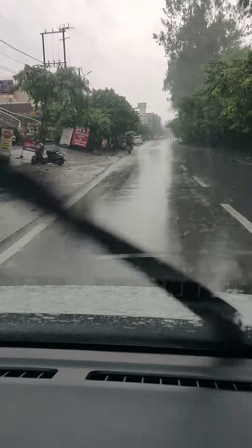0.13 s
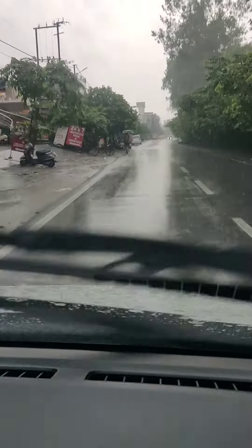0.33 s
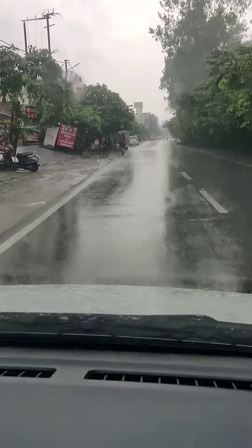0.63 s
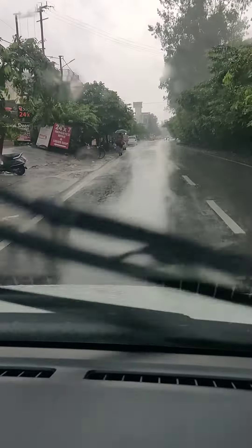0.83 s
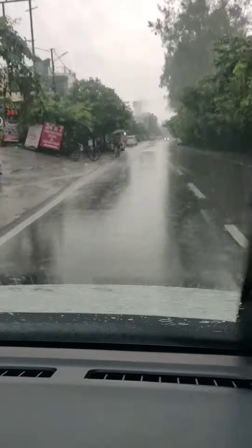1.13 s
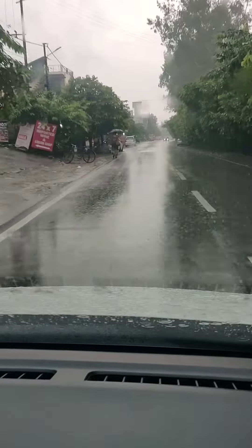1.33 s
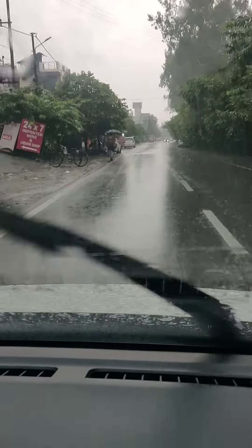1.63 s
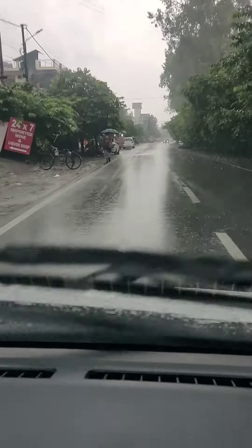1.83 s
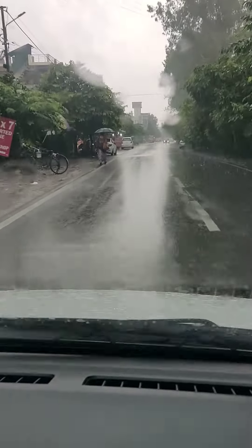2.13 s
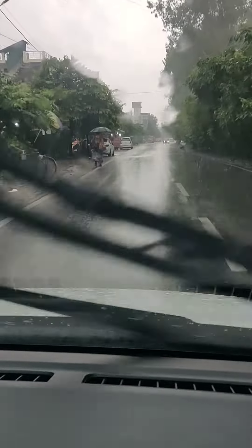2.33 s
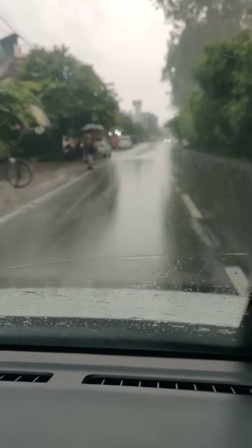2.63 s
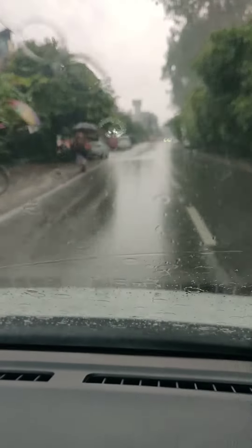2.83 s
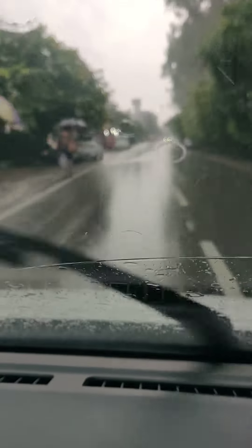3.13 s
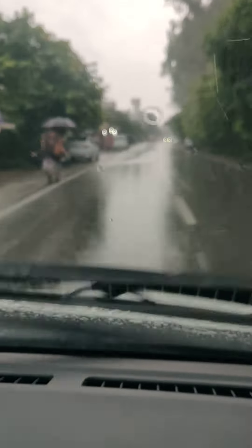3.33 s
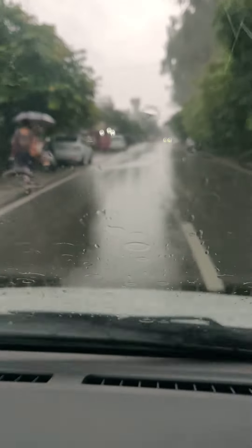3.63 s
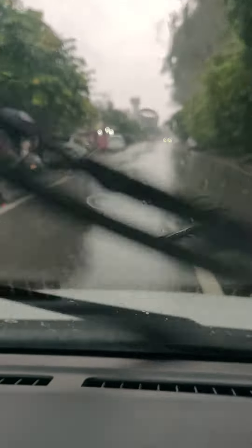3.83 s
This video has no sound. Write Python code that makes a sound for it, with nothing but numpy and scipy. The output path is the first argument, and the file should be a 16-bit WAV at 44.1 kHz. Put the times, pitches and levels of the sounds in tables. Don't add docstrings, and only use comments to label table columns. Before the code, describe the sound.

Deep road and engine rumble inside a small car, opening thin and quiet at 0.07 s, gaining bass at 0.2 s and growing fuller. Soft wet spray hiss lies beneath; a faint tread hum eases after 1.5 s. Dull wiper thuds fall near 0.7, 1.5, 2.2, 3.0 and 3.7 s. Rough-road knocks and trim rattle cluster at 1.9-2.4 s, then small jolts and wavering boom continue to 4 s.

```python
import sys
import numpy as np
from scipy import signal
from scipy.fft import rfft, irfft
from scipy.io import wavfile
from scipy.ndimage import uniform_filter1d

SR = 44100
rng = np.random.default_rng(int(sys.argv[2]) if len(sys.argv) > 2 else 0)


def transcribe(u):
    v = np.clip(np.atleast_2d(u).T, -1, 1)
    q = np.round(v * 32767).astype(np.int16)
    wavfile.write(sys.argv[1], SR, q)


def elevation(decibels):
    levels = np.asarray(decibels, float)
    return 10 ** (levels / 20)


N = 176400
t = np.arange(N) / SR
FREQ = np.maximum(np.arange(N // 2 + 1) * SR / N, 1)

# (frequency [Hz], density [dB per Hz])
SPRAY_COLOUR = [(400, -15), (800, -0.5), (1450, -5), (2950, -12), (5200, -19), (6900, -20), (9400, -36.5),
                (15500, -35.5)]
# (multiple of firing rate [1], level [dB])
ENGINE_ORDERS = [(1, -40.5), (2, -36), (4, -35.5)]
# (time [s], level [dB], length [s], top frequency [Hz])
THUDS = [
    (0.69, -24, .08, 420),
    (1.5, -26, .055, 320),
    (2.178, -30, 0.052, 426),
    (2.985, -25, 0.07, 480),
    (3.699, -28.5, 0.05, 317),
    (2.352, -28, .05, 594),
    (2.2, -27, .16, 330),
]
# (time [s], level [dB], ring [Hz], t60 [s])
KNOCKS = [(2.226, -21, 300, 0.14), (2, -13, 117, .15), (2.297, -12, 102, 0.3), (2.325, -13, 98, .2),
          (1.9, -20, 262, .25), (1.11, -21, 205, .25), (2.349, -16, 250, 0.12), (2.349, -17, 550, 0.16),
          (2.372, -20, 580, .14), (2.398, -21, 420, .1), (2.405, -23, 560, .08), (2.356, -27, 1050, 0.043),
          (2.356, -18, 464, .07), (2.374, -17.5, 264, 0.13), (2.386, -11.5, 277, 0.086),
          (2.7, -22, 500, 0.082), (2.7, -15, 104, .15), (2.1, -13, 117, 0.054), (2.177, -22, 470, .12),
          (2.181, -20, 390, .12), (.694, -20.5, 434, 0.05), (0.69, -14, 181, 0.11),
          (.706, -14.5, 127.7, 0.25), (.745, -14.5, 82, .16), (2.995, -20.5, 513, 0.046),
          (1.524, -14.5, 195, 0.16), (1.512, -12, 98.5, .14), (1.537, -22, 490, 0.045),
          (1.486, -18, 187, .08), (3.005, -17, 125, 0.22), (2.998, -17, 193, .15), (3.719, -17, 200, 0.12),
          (3.668, -18.5, 360, 0.044)]
# (time [s], level [dB], ring [Hz], t60 [s])
MORE_KNOCKS = [(.578, -29, 560, .04), (.574, -24, 330, .05), (.952, -24, 330, .05), (.978, -24.5, 232, .13),
               (1.165, -19, 278, .06), (1.424, -28, 560, 0.037), (1.432, -16, 128, .11), (1.664, -24, 395, 0.044),
               (1.718, -21, 431, .04), (3.094, -23, 360, 0.055), (3.148, -24.5, 395, .08), (3.189, -27, 555, .04),
               (3.235, -15, 124, .3), (3.122, -15, 90, .12), (3.6, -17, 100, .2), (2.664, -16, 130, .3),
               (3.33, -29.5, 610.5, .4), (3.431, -19.5, 228.5, .15), (3.583, -22, 257, 0.097),
               (3.761, -22.5, 330, .05), (3.841, -28, 513, .04)]
# (frequency [Hz], density [dB per Hz])
RUMBLE_COLOUR = [(20, -2), (45, -1.5), (90, -5.5), (170, -10.5), (330, -16), (600, -22), (760, -29),
                 (16000, -120)]
# (frequency [Hz], width [Hz], level [dB], surge [dB])
CABIN_MODES = [(27.5, 9, -29.5, 1), (52.7, 7.6, -32.5, 5), (103.3, 14.5, -36, 2.5), (132.2, 22, -35, 2.5),
               (193, 21.4, -38, 3), (254.1, 17, -40.5, 2.2), (337.5, 26.5, -42, 2), (439, 47, -48.5, 2.5),
               (605.3, 32, -47, 2)]
# (time [s], hiss level under settling gain [dB], bass over hiss [dB], boom over hiss [dB])
DRIVE = [(0.27, -56.5, 23, 22), (0.39, -54, 22.5, 18), (1.55, -49, 26, 18), (1.57, -49, 16.5, 6),
         (1.73, -48.5, 24.5, 24), (1.8, -49.5, 22.5, -6), (1.93, -48.5, 26, 26.5), (2.13, -48, 20.5, 13),
         (2.18, -47, 25.5, 21.5), (2.53, -47.5, 22, 10.5), (2.54, -47, 18.5, 17), (3.34, -47, 26.5, 24),
         (3.44, -47, 23.5, 16), (3.54, -47, 20, 26), (3.69, -47.5, 25, 7), (3.73, -47, 23, 21.5),
         (3.91, -47.5, 20.5, 16), (4.0, -47, 18, 24.5)]
# (frequency [Hz], left minus right [dB])
BALANCE = [(40, 1.5), (250, 0.7), (700, 3.5), (1400, 4), (2800, 4), (5500, 0.5), (7000, 1.5), (9500, -5.5)]
# (frequency [Hz], likeness [0-1])
ALIKE = [(30, 0.98), (80, .99), (140, 0.86), (300, 0.97), (600, 0.73), (900, 0.2), (1400, 0), (15000, 0.02)]
# (frequency [Hz], depth share [1])
PATCHINESS = [(1500, 0.03), (3000, 0.27), (4500, 1.05), (5400, 1.3), (6200, 1.3), (8500, 1.3),
              (11000, 1.06), (15000, 0.7)]
# (time [s], gain [dB])
OPENING_GAIN = [(.068, -23), (.09, -20.5), (.125, -17), (.17, -14), (.23, -11)]

DRIVE_S, DRIVE_HISS_DB, DRIVE_BASS_DB, DRIVE_BOOM_DB = np.array(DRIVE, float).T
HISS_FULL_DB = -48
FIRING_HZ = 26.24


def table(rows, hz):
    rows = np.array(rows, float)
    return np.interp(np.log(hz), np.log(rows[:, 0]), rows[:, 1])


def level(x, db):
    return x * elevation(db) / np.sqrt(np.mean(x ** 2) + 1e-20)


def ring(x, hz, width_hz):
    return signal.lfilter(*signal.iirpeak(hz, hz / width_hz, fs=SR), x)


def walk(rate_hz):
    hold = int(SR / rate_hz)
    steps = np.repeat(rng.standard_normal(N // hold + 1), hold)
    w = uniform_filter1d(uniform_filter1d(steps, hold), hold)[:N]
    return (w - w.mean()) / w.std()


def noise():
    return rng.standard_normal(N)


def pair(excite):
    alike = np.clip(table(ALIKE, FREQ), 0, 1)
    mid = rfft(excite()) * np.sqrt(1 + alike)
    side = rfft(excite()) * np.sqrt(1 - alike)
    return np.array([mid + side, mid - side])


def bands(spectra, colour, lo_hz, count, flicker_db, shared_db):
    out = 0
    octave = np.log2(FREQ / lo_hz)
    spectra = spectra * elevation(table(colour, FREQ)) * (FREQ > 12)
    for k in range(count):
        place = np.clip(2 * octave - k, -9 if k else 0, 9 if k < count - 1 else 0)
        share = np.cos(np.pi / 2 * np.clip(place, -1, 1)) ** 2
        out = out + irfft(spectra * share, N) * elevation(flicker_db * walk(9.02) + shared_db)
    return out


def wet():
    drops_per_s, spread_db, decay_s = 900, 3, 0.002
    drops = (rng.random(N) < drops_per_s / SR) * elevation(spread_db * rng.exponential(size=N))
    smear = signal.lfilter([1], [1, -np.exp(-1 / (decay_s * SR))], drops)
    return noise() + level(smear * noise(), -9)


def spray():
    colour = [(60, -57)] + list(SPRAY_COLOUR)
    hiss = bands(pair(wet), colour, 750, count=9, flicker_db=0.25, shared_db=0.5 * walk(12))
    return level(hiss, -38.5)


def hum():
    hz, width_hz, surge_db, fades_s = 612, 45, 2.5, 1.45
    push = irfft(pair(noise), N) * elevation(surge_db * walk(12))
    tone = ring(ring(push, hz, width_hz), hz, width_hz)
    return level(tone, -43) / (1 + (t / fades_s) ** 6)


def engine():
    boom_order, boom_db = 5, -2
    phase = 2 * np.pi * np.cumsum(FIRING_HZ * (1 + 0.0199 * walk(1.5))) / SR
    low = 0
    for order, db in ENGINE_ORDERS:
        gain = np.sqrt(2) * elevation(db + 2.9 * walk(5.09))
        low = low + gain * np.sin(order * phase + rng.uniform(0, 2 * np.pi))
    boom_phase = 2 * np.pi * boom_order * np.cumsum(FIRING_HZ * (1 + 0.06 * walk(14))) / SR
    swell_db = np.interp(t, DRIVE_S, DRIVE_BOOM_DB) + HISS_FULL_DB + boom_db + 2.55 * walk(11)
    port_phase = np.array([[0.12], [-0.12]])
    return low + np.sqrt(2) * elevation(swell_db) * np.sin(boom_phase + port_phase)


def wipers():
    attack_s, low_hz = 0.0071, 83
    out = 0
    shake = irfft(pair(noise), N)
    for at, db, length_s, top_hz in THUDS:
        u = np.maximum(t - at, 0)
        env = np.clip(u / attack_s, 0, 1) * np.exp(-(u / length_s) ** 2)
        sos = signal.butter(3, [low_hz, top_hz], "band", fs=SR, output="sos")
        out = out + env * level(signal.sosfilt(sos, shake), db)
    return out


def knocks():
    out = 0
    for at, db, hz, t60_s in list(KNOCKS) + list(MORE_KNOCKS):
        u = np.maximum(t - at, 0)
        env = elevation(db - 60 * u / t60_s) * (1 - np.exp(-u * hz * 2))
        port_phase = 0.29 * hz / 300 * np.array([[1], [-1]])
        out = out + env * np.sin(2 * np.pi * hz * u + port_phase)
    return out


def road():
    rumble = bands(pair(noise), RUMBLE_COLOUR, 36.0, count=9, flicker_db=1.03, shared_db=0.5 * walk(4.52))
    boom = level(rumble, -24)
    push = irfft(pair(noise), N)
    for hz, width_hz, db, surge_db in CABIN_MODES:
        surging = ring(push * elevation(surge_db * walk(6.03)), hz, 1.47 * width_hz)
        boom = boom + level(ring(surging, hz, 1.49 * width_hz), db)

    rough_hz, rough_mean_db = 107, 24
    tread_hz, early_db, late_db, eases_s = 330, 3.5, -0.4, 1.7
    spectra = rfft(boom)
    bass = irfft(spectra / (1 + (FREQ / rough_hz) ** 4), N)
    tread = irfft(spectra / (1 + (tread_hz / FREQ) ** 4), N)
    bass_db = np.interp(t, DRIVE_S, DRIVE_BASS_DB) - rough_mean_db
    tread_db = late_db + (early_db - late_db) / (1 + (t / eases_s) ** 4)
    return boom + bass * (elevation(bass_db) - 1) + tread * (elevation(tread_db) - 1)


def scene():
    return spray() + hum() + engine() + wipers() + knocks() + road()


def swap_mid_side(x):
    return np.array([x[0] + x[1], x[0] - x[1]])


def patchy(x):
    patch_hz, patch_s, patch_db, grain_db, hole_power = 110, 0.052, 6.6, 3.6, 1.7
    hz, at, z = signal.stft(x, SR, nperseg=2048)
    row = np.arange(len(hz)) // max(int(patch_hz / hz[1]), 1) % 400
    wide = patch_s / at[1]
    start = rng.random(400)[row, None]
    column = (np.arange(len(at)) / wide + start).astype(int) % 400
    deep = rng.exponential(size=(2, 400, 400))[:, row[:, None], column]
    share = table(PATCHINESS, np.maximum(hz, 1))[:, None]
    gain = elevation(share * (grain_db * rng.standard_normal(z.shape) - patch_db * deep ** hole_power))
    gain = gain / np.sqrt(np.mean(gain ** 2, axis=(0, 2), keepdims=True))
    z = swap_mid_side(swap_mid_side(z) / 2 * gain)
    return signal.istft(z, SR, nperseg=2048)[1][:, :N]


def top_cut(x):
    return signal.sosfilt(signal.butter(12, 15960, fs=SR, output="sos"), x)


def record(dry):
    opens_s, bass_opens_s, bass_shut_db, bass_hz, top_hz = 0.069, 0.213, -15, 170, 15770
    pad = 2000
    lead = (2 * dry[:, -1:] - dry[:, :-pad - 1:-1]) * np.hanning(2 * pad)[pad:]
    heard = patchy(np.hstack([lead, dry[:, pad:], lead]))
    tilt_db = table(BALANCE, FREQ) / 2
    spectra = rfft(heard) * elevation(np.array([tilt_db, -tilt_db])) * (FREQ < top_hz)

    low = 1 / (1 + (FREQ / bass_hz) ** 4)
    bass_db = bass_shut_db * np.clip((bass_opens_s - t) / 0.01, 0, 1)
    x = irfft(spectra * (1 - low), N) + irfft(spectra * low, N) * elevation(bass_db)

    opening_s, opening_db = np.array(OPENING_GAIN, float).T
    gain_s = np.append(opening_s, DRIVE_S)
    gain_db = np.append(opening_db, DRIVE_HISS_DB - HISS_FULL_DB)
    mix = x * elevation(np.interp(t, gain_s, gain_db)) * np.clip((t - opens_s) / 0.001, 0, 1)
    return top_cut(mix)


dry = scene()
out = record(dry)
transcribe(out)
```